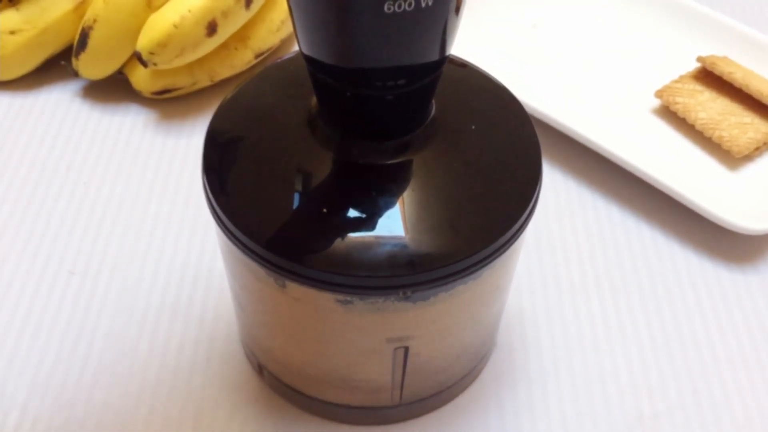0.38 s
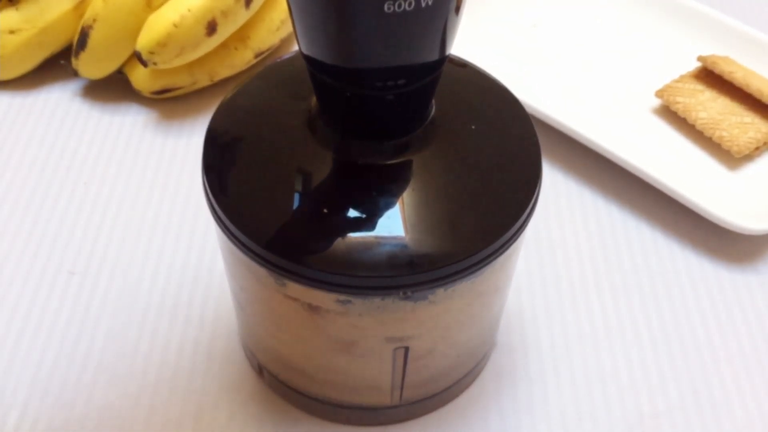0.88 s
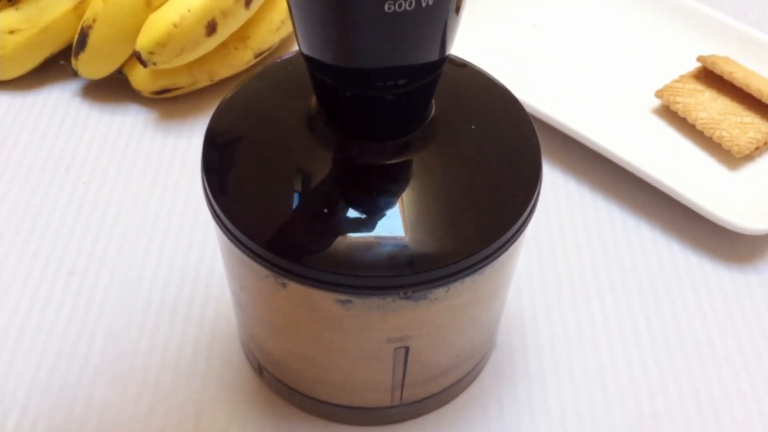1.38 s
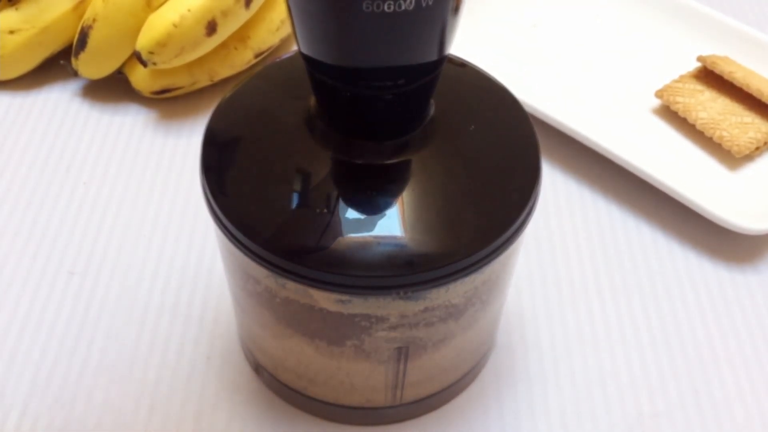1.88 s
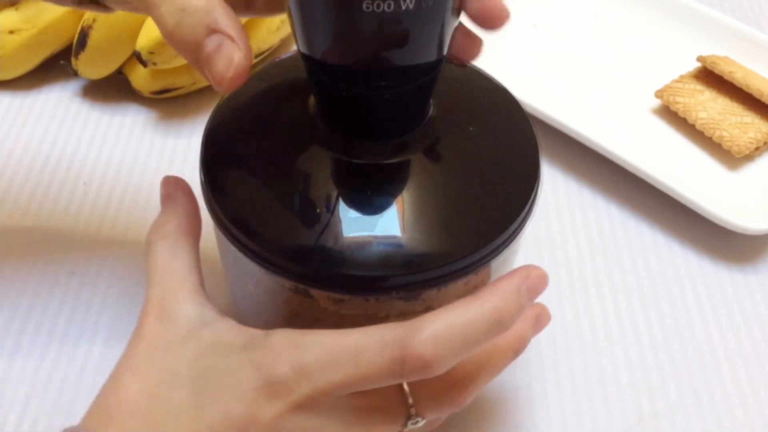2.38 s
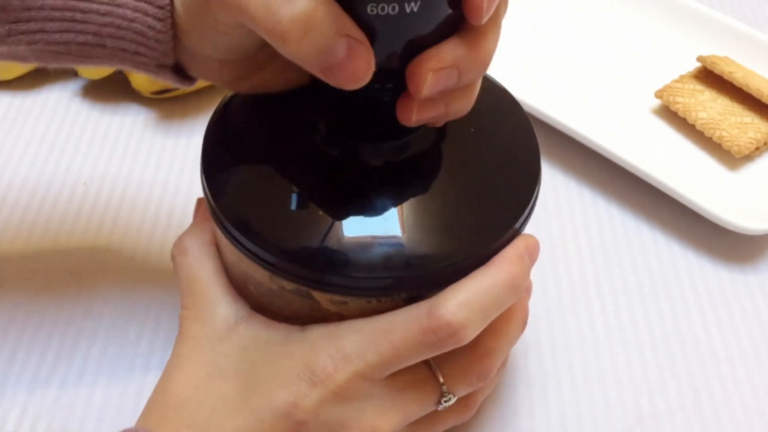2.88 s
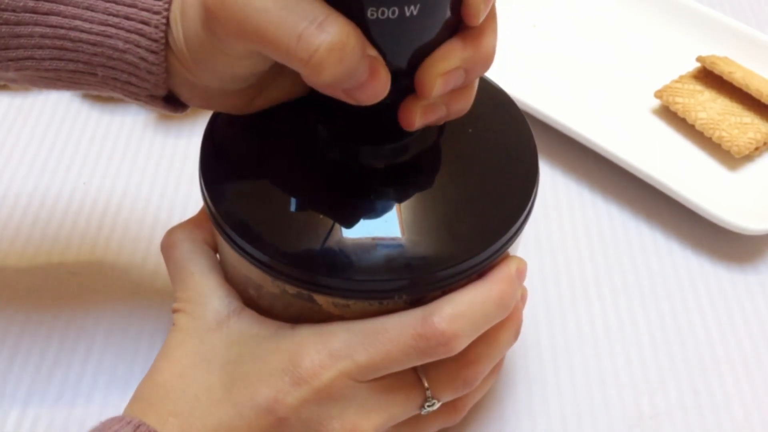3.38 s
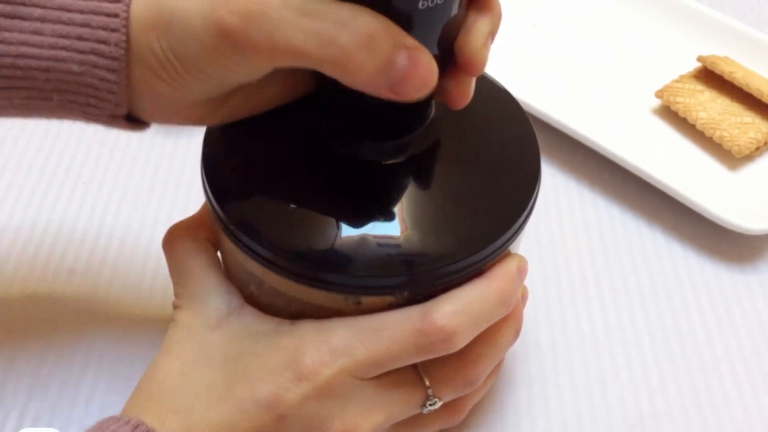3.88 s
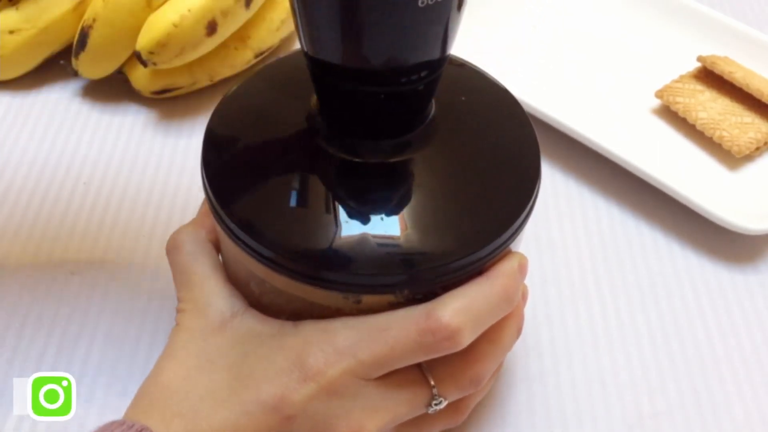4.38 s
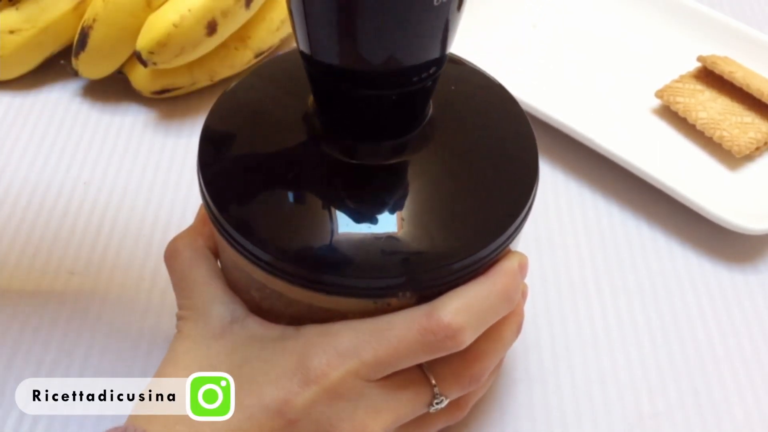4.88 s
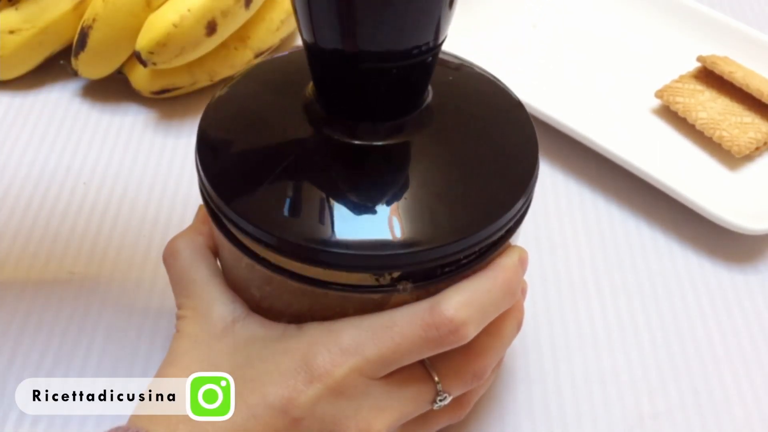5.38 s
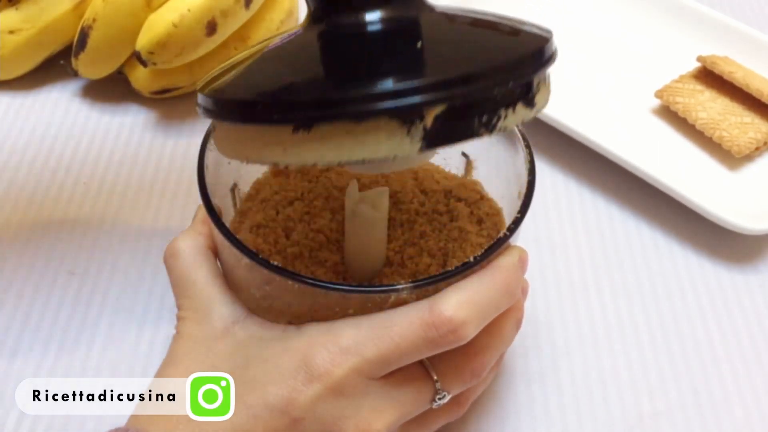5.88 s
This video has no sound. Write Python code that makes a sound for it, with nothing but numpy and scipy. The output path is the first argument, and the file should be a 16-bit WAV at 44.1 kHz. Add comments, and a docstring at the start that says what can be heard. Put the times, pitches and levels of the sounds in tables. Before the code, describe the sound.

Close up in a kitchen, a chopper is already whirling biscuit chunks: a loud dense rattle on the plastic wall with bright crumb hiss. It runs down by two seconds, gives a much fainter short whirl, then stops. Small handling ticks, a sharp unlatching snap, a pause, and gritty plastic rubs and ticks as the lid comes off. Slight room echo; sound in the left channel only.

```python
"""Electric chopper on biscuits

A small electric chopper whirls biscuit pieces round a lidded plastic bowl in a kitchen and runs down twice.
Chunks and crumbs are random grains that ring wall, base and lid; hands then grip and rub the bowl (stick-slip
grains), the motor unit unlatches with a snap, and the lid is twisted loose and lifted off among ticks.
Echo and faint room tone surround it. One microphone feeds the left channel; the right one is silent."""
import sys
import numpy as np
from scipy import signal
from scipy.fft import rfft, irfft
from scipy.io import wavfile

SR = 44100
rng = np.random.default_rng(int(sys.argv[2]) if len(sys.argv) > 2 else 0)


def inscribe(sig):
    """Save sig as 16-bit PCM at rate SR to the path in sys.argv[1].

    A 1-D sig is mono; a 2-D sig holds one channel per row.
    Samples are clipped to [-1, 1] before scaling.
    """
    pcm = np.round(np.clip(np.atleast_2d(sig).T, -1, 1) * 32767)
    wavfile.write(sys.argv[1], SR, pcm.astype(np.int16))


def voltage_ratio(level):
    """Linear amplitude factor for a level in decibels (scalar or array-like)."""
    return 10 ** (np.asarray(level, float) / 20)


N = 275625

# resonances of the base on the table: centre_hz, width_hz, level_db
BASE_MODES = [(113, 35, -4), (190, 110, -9.5), (299, 31, 2), (376, 66, -4), (699.6, 62, -4.5)]


def whirl():
    """Chunks ring the wall and drum the base; crumbs spray lid and wall in step with the blades."""
    # the two whirls: time_s, spray_reference_db, drumming_db (relative to the spray)
    whirl_levels = [
        [(0.0, -24, -11), (0.3, -25, -9.5), (0.7, -27, -7.5), (1.2, -27, -8.5), (1.45, -29, -6.5),
         (1.52, -31.5, -8.5), (1.66, -36, -12), (1.72, -42, -12), (1.86, -47, -5.5), (1.9, -57.5, -11),
         (1.97, -78.5, -3)],
        [(2.192, -45, -25), (2.215, -42, -13), (2.29, -46, -15), (2.38, -48.5, -5), (2.45, -56.5, -17),
         (2.53, -70, -4), (2.57, -85, -3)],
    ]
    # blade speed: time_s, passes_per_s
    blade_speed = [(0, 65), (1.3, 68.5), (1.97, 22.3), (2.19, 41.1), (2.57, 17)]
    # resonances of the bowl wall: centre_hz, width_hz, level_db
    wall_modes = [(894, 240, -5.5), (1186, 350, 0), (1301, 320, 2.5), (1430, 340, 0.5), (1770, 1100, -17),
                  (2341, 33, 5.5), (2483, 100, -1.5)]
    # resonances of the lid: centre_hz, width_hz, level_db
    lid_modes = [(3580, 330, -5), (4706, 190, 8), (5460, 250, 3.5), (6260, 900, -2.5), (6510, 230, 3.5),
                 (9200, 170, -24), (9040, 240, -3.5)]
    # spectrum of the crumb hiss: frequency_hz, level_db
    crumb_spectrum = [(88, -41), (150, -25.5), (308, -10), (561, -15), (1430, -3.5), (1830, -12.5),
                      (2410, -12), (2870, -16), (3550, -6), (4060, -15), (5540, -7.5), (7560, -18),
                      (15500, -26)]
    rattle_db, hits_per_s = 1.0, 500   # chunk rattle above the spray; mean rate before its surges
    rattle_surge_db, drumming_surge_db = 2.5, 3   # random swing as the load tumbles

    crumb_db, drumming_db = in_time(whirl_levels)
    chunk_db = crumb_db + rattle_db + rattle_surge_db * np.clip(drift(22), -2, 1.2)
    drum_db = crumb_db + drumming_db + drumming_surge_db * drift(6)

    passes = np.cumsum(in_time([blade_speed], silent=0)[0]) / SR
    # the half-rate term makes one blade throw more
    sweep = voltage_ratio(1.2 * np.cos(2 * np.pi * passes) + 1.0 * np.cos(np.pi * passes))

    hits = grains(hits_per_s * voltage_ratio(2.5 * np.clip(drift(15), -2, 1.2)), spread_db=2.3)
    # a soft contact has no sharp edge
    soft_contact = signal.butter(2, [700, 3200], "band", fs=SR, output="sos")
    wall_ring = struck(hits, wall_modes, scatter_db=5.5)
    wall = rms_one(signal.sosfilt(soft_contact, wall_ring), 800, 3800)
    base_hits = hits + grains(900, spread_db=1.0)
    drum = rms_one(struck(base_hits, BASE_MODES, scatter_db=6.0), 140, 650)

    spray = sweep * voltage_ratio(1.0 * drift(40)) * grains(7000, spread_db=2.0)
    lid = rms_one(struck(spray, lid_modes, scatter_db=19.5), 4000, 9000)
    hiss = rms_one(colour(spray, crumb_spectrum), 3500, 9000)
    crumbs = voltage_ratio(crumb_db) * (voltage_ratio(-4) * lid + voltage_ratio(-1.5) * hiss)
    return voltage_ratio(chunk_db) * wall + voltage_ratio(drum_db) * drum + crumbs + biggest_chunks()


def biggest_chunks():
    """Each large chunk flung at the wall rings it low and high, ticks the lid and cracks."""
    # impacts: time_s, wall_level_db, wall_pitch_hz, upper_ring_db, lid_tick_db
    chunks = [(0.0014, -12, 1360, -14.5, -18), (0.0189, -6, 1360, -20, -16.5),
              (0.0485, -10, 1300, -27, -18), (0.0846, -13.5, 1580, -22.5, -17),
              (0.098, -11.5, 1320, -24, -23), (0.1176, -14, 1330, -33, -26), (0.1347, -14, 1170, -21, -19),
              (0.1484, -7.5, 1250, -17.5, -13.5), (0.2048, -18, 1230, -22, -20),
              (0.2299, -10.5, 1380, -19, -18), (0.2472, -8.5, 1260, -16.5, -21),
              (0.2621, -15, 1370, -16.5, -23), (0.31, -12, 1410, -25, -22.5),
              (0.3288, -9.5, 1460, -21, -23.5), (0.3547, -16.5, 1240, -25.5, -17.5),
              (0.3771, -15, 1150, -28, -23.5), (0.396, -8, 1400, -11, -21),
              (0.429, -16, 1440, -27.5, -17.5), (0.4553, -11, 1160, -27, -22),
              (0.491, -22, 1500, -23.5, -22), (0.5167, -18, 1430, -27, -26.5),
              (0.5383, -14, 1450, -25.5, -21), (0.5738, -5.5, 1380, -23.5, -20),
              (0.5946, -18, 1390, -23.5, -14.5), (0.633, -13.5, 1290, -29.5, -23.5),
              (0.6639, -15.5, 1470, -26.5, -21.5), (0.7028, -13, 1350, -22.5, -24),
              (0.7581, -9.5, 1150, -21.5, -20.5), (0.777, -10, 1260, -26.5, -21.5),
              (0.8014, -9.5, 1250, -30, -20.5), (0.8092, -6.5, 1410, -24, -22.5),
              (0.839, -13, 1330, -30, -24), (0.8708, -10.5, 1510, -28, -24),
              (0.8894, -9.5, 1260, -28, -19.5), (0.9455, -9.5, 1340, -28, -25),
              (1.0213, -13, 1270, -28, -24.5), (1.047, -13, 1310, -28, -24), (1.096, -11.5, 1390, -28, -19),
              (1.135, -12, 1450, -19, -19), (1.1838, -11.5, 1430, -20, -14.5),
              (1.2025, -10, 1170, -25, -23.5), (1.2531, -15, 1320, -31, -26),
              (1.2793, -12.5, 1250, -29.5, -26), (1.3289, -12, 1370, -31, -25.5),
              (1.395, -23.5, 1250, -31.5, -15.5), (1.431, -10.5, 1250, -30.5, -26.5),
              (1.4568, -5, 1430, -25.5, -23), (1.5223, -11.5, 1290, -25, -31),
              (1.5429, -19, 1160, -31.5, -29), (1.6247, -17.5, 1320, -40, -27),
              (1.6573, -20, 1470, -34, -20.5), (1.7521, -29, 1325, -44, -22.5),
              (1.8104, -49, 1180, -32, -39), (1.8314, -28, 1350, -41, -42), (2.1936, -20, 1410, -48, -52),
              (2.229, -38, 1410, -49, -32), (2.2633, -33, 1190, -52, -39), (2.2857, -43, 1300, -53, -32),
              (2.3243, -28.5, 1340, -62.5, -29.5), (2.3815, -30, 1400, -54, -37),
              (2.4382, -37, 1300, -56, -40.5), (2.5026, -46, 1203, -53, -61)]
    upper_ring_hz, lid_tick_hz, pitch_scatter = 2380, 5470, 0.037   # scatter as a fraction

    out = crack([c[0] for c in chunks], [c[4] - 2.5 for c in chunks], lasts_s=0.0011, above_hz=2500)
    detune = 1 + pitch_scatter * rng.standard_normal((len(chunks), 2))
    for (s, db, hz, upper_db, tick_db), (upper, tick) in zip(chunks, detune):
        add(out, s, db + 0.1, hz, 0.016)
        add(out, s, upper_db + 5, upper_ring_hz * upper, 0.03)
        add(out, s, tick_db + 5, lid_tick_hz * tick ** 2, 0.009)   # squared: scatters twice as far
    return out


def snap():
    """The latch lets go in a few slips; each cracks and rings the bright shell and the dull housing."""
    # slips of the latch: time_s, bright_db, dull_db, crack_db
    latch_slips = [(3.6403, -28, -52, -40), (3.6433, -23.5, -48, -52), (3.6453, -10, -13, -32.5),
                   (3.6472, -29.5, -14.5, -53), (3.6488, -28, -9, -40), (3.6552, -42, -41, -35)]
    # rings of the dull housing: pitch_hz, level_db, t60_s
    housing_rings = [(248, -19.5, 0.16), (428, -14.5, 0.16), (336, -10, 0.032), (446, 4, 0.018),
                     (718, 4, 0.011), (862, -2.5, 0.026), (1213, -11, 0.045), (1337, 10.5, 0.016),
                     (1660, 4, 0.018), (1865, -25, 0.014)]
    # rings of the bright shell: pitch_hz, level_db, t60_s
    shell_rings = [(3230, 5, 0.01), (4070, 8.5, 0.0047), (4590, 6.5, 0.0067), (5620, 1, 0.011),
                   (8000, 3, 0.0049)]

    times, cracks_db = [slip[0] for slip in latch_slips], [slip[3] for slip in latch_slips]
    out = crack(times, cracks_db, lasts_s=0.00069, above_hz=2700)
    for s, bright_db, dull_db, _ in latch_slips:
        for level_db, rings in ((bright_db, shell_rings), (dull_db, housing_rings)):
            for hz, db, t60 in rings:
                add(out, s, level_db + db - 11.5, hz, t60)
    return out


def ticks():
    """Plastic and crumbs tick: a crack of a few milliseconds, a short bright ring and a dull knock."""
    # ticks: time_s, bright_db, bright_pitch_hz, dull_db, dull_pitch_hz, crack_db
    tick_hits = [(2.5504, -57, 3560, -70, 1520, -74), (2.9267, -38, 3630, -41, 924, -58),
                 (2.9926, -34.5, 5540, -46.5, 751, -45), (3.0394, -61, 4030, -54, 744, -82),
                 (3.1572, -60, 5220, -64, 1200, -78), (3.2994, -59, 5960, -71, 938, -77),
                 (3.3478, -52, 3400, -66, 1800, -59.5), (3.4244, -67, 3480, -67, 1030, -78),
                 (3.5543, -47, 5350, -66, 778, -63), (3.7918, -39, 5360, -43.5, 1160, -53),
                 (4.5994, -44, 5430, -51, 745, -57), (4.7641, -45, 5660, -61, 930, -64),
                 (4.8788, -54, 5600, -70, 1040, -61), (4.9057, -33, 6150, -51, 1050, -49.5),
                 (4.9314, -47, 5140, -57, 953, -61), (5.0374, -53, 5460, -54, 1176, -60.5),
                 (5.0759, -45, 8800, -64, 702, -58), (5.1154, -61, 5640, -67, 947, -75),
                 (5.1627, -53, 5230, -63, 1160, -65), (5.1926, -48, 5540, -61, 1620, -62),
                 (5.2094, -47, 5610, -58, 1600, -55), (5.222, -34.5, 5610, -58, 953, -49),
                 (5.2314, -35, 5220, -55, 1030, -44), (5.2444, -37, 3360, -43, 1230, -47),
                 (5.2644, -33, 6100, -47, 1330, -49), (5.3044, -41, 4700, -67, 891, -58),
                 (5.3283, -43, 4600, -68, 1190, -55), (5.3822, -46, 5350, -63, 1320, -65),
                 (5.4355, -38, 3330, -57, 1080, -55), (5.4535, -37, 4530, -47.5, 864, -54),
                 (5.472, -44, 3800, -47, 907, -50), (5.4834, -39, 5460, -57, 1100, -60),
                 (5.5328, -48, 4780, -65, 888, -59), (5.5598, -48, 4770, -67, 750, -61),
                 (5.5797, -50, 4750, -71, 401, -67), (5.5952, -48, 5600, -66, 1190, -72),
                 (5.6074, -44, 5830, -64, 786, -67), (5.6466, -45, 5560, -57, 1180, -57),
                 (5.68, -26.5, 5570, -52, 1590, -52), (5.6864, -33, 4570, -49, 401, -52),
                 (5.7264, -38, 5040, -46, 401, -49), (5.7374, -45, 5170, -41, 472, -55),
                 (5.7778, -50, 5450, -50.5, 1010, -64), (5.8147, -58, 4400, -57, 494, -70),
                 (5.8381, -44, 4470, -56, 970, -67), (5.8915, -39, 5200, -54, 1034, -59),
                 (5.911, -34, 4140, -47, 448, -51), (5.9389, -34, 5230, -52, 525, -54),
                 (5.9768, -37.5, 5310, -58, 684, -59), (6.0412, -38.5, 4580, -47, 682, -64)]

    out = crack([t[0] for t in tick_hits], [t[5] + 9 for t in tick_hits], lasts_s=0.0017, above_hz=1500)
    for s, db, hz, dull_db, dull_hz, _ in tick_hits:
        add(out, s, db - 2.0, hz, 0.009)
        add(out, s, dull_db + 6.5, dull_hz, 0.006 + 7.6 / dull_hz)   # low knocks ring longer
    return out


def rubs():
    """Stick and slip: clumped grains in the treble, softer ones in the body, pushes through the table."""
    # rubs of hands and lid rim: start_s, length_s, rim_scratch_db, fine_grit_db, body_db, scratch_pitch_hz
    strokes = [(2.923, 0.0084, -70, -79.5, -51.5, 5380), (2.989, 0.0052, -69.5, -69.5, -62, 4880),
               (3.154, 0.012, -72, -79, -74, 5050), (3.553, 0.01, -72, -81, -74.5, 5000),
               (3.628, 0.026, -58.5, -62.5, -59.5, 4800), (3.647, 0.047, -58.5, -67, -47, 5070),
               (3.728, 0.08, -65, -65.5, -52, 5140), (4.583, 0.046, -57, -58, -52, 5400),
               (4.643, .03, -67, -77, -61, 5360), (4.69, .018, -65.5, -72.5, -63, 5280),
               (4.753, .022, -67, -77.5, -64.5, 5400), (4.876, 0.053, -58, -64, -55, 5630),
               (4.954, 0.039, -65, -68, -56.5, 5150), (5, 0.037, -78, -76.5, -65.5, 5100),
               (5.218, 0.039, -54, -57.5, -50.5, 5380), (5.255, 0.076, -59.5, -67, -61, 4900),
               (5.386, 0.033, -58, -75, -70, 5200), (5.421, 0.026, -62, -61, -62, 5100),
               (5.448, 0.037, -57, -60, -54, 5230), (5.496, 0.046, -66.5, -79, -71.5, 5580),
               (5.59, 0.056, -57, -78, -73.5, 5500), (5.652, 0.032, -50.5, -68, -74, 5600),
               (5.679, 0.026, -40.5, -57.5, -56.5, 5440), (5.714, 0.031, -52.5, -58.5, -55, 5350),
               (5.756, 0.038, -57.5, -64.5, -66, 5300), (5.812, 0.05, -51.5, -71, -65, 4480),
               (5.896, .022, -53, -61, -56, 5080), (5.933, 0.013, -56, -66, -61.5, 5250),
               (5.968, 0.026, -60, -71.5, -62, 5000)]
    # spectrum of the fine grit: frequency_hz, level_db
    grit_spectrum = [(1500, -32), (2500, -7), (3300, -0.5), (4500, -3), (6500, -2.5), (7200, -9.5),
                     (8900, -7.5), (10200, -17.5), (13500, -15), (15800, -21)]
    # spectrum of the rubbed body: frequency_hz, level_db
    body_spectrum = [(210, -29), (350, -11.5), (493, -2.5), (559, -8.5), (916, 0.5), (1830, -3), (2290, -8),
                     (3000, -9), (3900, -32), (6600, -120)]
    rise_db_per_s, fall_db_per_s = 1500, 1500   # every rub swells and dies alike
    sag_db, thump_db = 2, -5   # weakening along a stroke; push relative to the body

    t, rows = np.arange(N) / SR, np.array(strokes)
    levels, rim_hz = np.zeros((3, N)), np.full(N, rows[0, 5])
    for start, length, *dbs, hz in rows:
        rise_db = rise_db_per_s * (t - start)
        fall_db = fall_db_per_s * (start + length - t)
        shape_db = np.minimum(0, np.minimum(rise_db, fall_db))
        shape_db = shape_db - sag_db * np.clip((t - start) / length, 0, 1)
        levels = levels + voltage_ratio(np.array(dbs)[:, None] + np.maximum(shape_db, -100))
        rim_hz[t > start - 0.02] = hz   # the pitch is in place before the rub is heard
    rim_gain, grit_gain, body_gain = levels

    slips = grains(3500 * voltage_ratio(8.0 * drift(90)), spread_db=2.2) * voltage_ratio(2.5 * drift(80))
    grit = rms_one(colour(slips, grit_spectrum), 7000, 14000)
    rim_hz = np.clip(rim_hz, 3500, 7000)
    # two resonances in a row give steep flanks
    scratch = gliding(slips + 1e-18, rim_hz, width_hz=900)
    rim = rms_one(gliding(scratch, rim_hz, width_hz=1500))
    body = rms_one(colour(slips + grains(2200, spread_db=2.0), body_spectrum), 690, 1700)
    pushes = grains(300, spread_db=4.0)
    thump = rms_one(struck(pushes, BASE_MODES[:3], scatter_db=3.0), 80, 400)

    treble = voltage_ratio(-1.5) * grit_gain * grit + voltage_ratio(-9.0) * rim_gain * rim
    return treble + voltage_ratio(-3.5) * body_gain * (body + voltage_ratio(thump_db) * thump)


def kitchen(x):
    """Echo cloud: noise that dies band by band, after a short gap."""
    # decay of the kitchen: frequency_hz, t60_s
    decay = [(100, 0.17), (1400, 0.95), (3000, 0.65), (8000, 0.36), (15000, .15)]

    t, tail = np.arange(int(0.8 * SR)) / SR, 0
    hz, t60 = np.transpose(decay)
    edges = np.geomspace(80, 16000, 13)
    for low, high in zip(edges, edges[1:]):
        band_pass = signal.butter(2, [low, high], "band", fs=SR, output="sos")
        band = signal.sosfilt(band_pass, rng.standard_normal(len(t)))
        band_t60 = np.interp(np.log(low * high) / 2, np.log(hz), t60)
        tail = tail + band * voltage_ratio(-60 * t / band_t60)
    tail = tail * np.clip(t / 0.0024 - 0.3, 0, 1)   # gap, then a quick fade-in
    return signal.fftconvolve(x, tail / np.sqrt(np.sum(tail ** 2)))[:N]


def room_tone():
    """Faint flickering hiss above a far rumble in the low room modes, each fluttering on its own."""
    # spectrum of the hiss: frequency_hz, level_db
    air_spectrum = [(130, -28.5), (220, -6), (403, -13), (473, -19.5), (700, -15.5), (807, -17.5),
                    (947, -14), (1330, -19.5), (1740, -19.5), (2270, -29.5), (5140, -37), (6040, -36),
                    (15500, -47)]
    # room modes stirred by the rumble: centre_hz, width_hz (of the first of two passes), level_db
    room_modes = [(53.6, 28, 0), (113.8, 28, -0.5), (181, 6.9, -6), (247, 4.9, -15)]
    # wavering of the rumble: time_s, level_db
    rumble_swell = [(1.8, -79), (1.88, -61.5), (2.17, -69), (2.28, -56), (2.44, -73), (2.46, -50.5),
                    (2.51, -82), (2.56, -51.5), (2.66, -73), (2.67, -58.5), (3.6, -53.5), (3.66, -44),
                    (3.89, -66.5), (4.01, -56), (4.68, -59), (4.95, -49), (5.18, -61), (5.27, -45),
                    (5.3, -58), (5.71, -52), (5.89, -62.5), (6.09, -55.5), (6.15, -66), (6.2, -59)]
    air_db, flutter_db = -67, 2.5

    hiss = rms_one(colour(rng.standard_normal(N), air_spectrum), 230, 3000)
    air = voltage_ratio(air_db + 1.5 * drift(6)) * hiss
    rumble = np.zeros(N)
    for hz, width, db in room_modes:
        narrow = resonance(rng.standard_normal(N), hz, width)
        mode = rms_one(resonance(narrow, hz, 2 * width))
        rumble += voltage_ratio(db + flutter_db * drift(6.5)) * mode
    s, swell_db = np.transpose(rumble_swell)
    return air + voltage_ratio(np.interp(np.arange(N) / SR, s, swell_db)) * rms_one(rumble)


def crack(times, levels_db, lasts_s, above_hz):
    """Short bursts of bright noise, each dying exponentially with time constant lasts_s."""
    starts = np.zeros(N)
    starts[np.round(np.array(times) * SR).astype(int)] = voltage_ratio(np.array(levels_db))
    envelope = signal.lfilter([1], [1, -np.exp(-1 / (lasts_s * SR))], starts)
    dying = envelope * rng.standard_normal(N)
    return signal.sosfilt(signal.butter(2, [above_hz, 11000], "band", fs=SR, output="sos"), dying)


def add(out, s, db, hz, t60):
    """A dying sine that starts at s, with a contact time of a fraction of a millisecond."""
    i, t = round(s * SR), np.arange(int(t60 * SR)) / SR
    envelope = voltage_ratio(db - 60 * t / t60) * (1 - np.exp(-t / 0.0002))
    out[i:i + len(t)] += envelope * np.sin(2 * np.pi * hz * t)


def grains(per_s, spread_db):
    """Random clicks, mostly small and a few large; power independent of their rate."""
    sizes = voltage_ratio(spread_db * np.minimum(rng.exponential(1, N), 5)) * rng.choice([-1, 1], N)
    per_s = np.maximum(per_s, 10)
    return sizes * (rng.random(N) < per_s / SR) / np.sqrt(per_s)


def struck(hits, modes, scatter_db):
    """Every hit drives every resonance with a strength of its own; neighbours have opposite signs."""
    out = np.zeros(N)
    for k, (hz, width, db) in enumerate(modes):
        strength = voltage_ratio(scatter_db * np.clip(rng.standard_normal(N), -2, 2))
        out += voltage_ratio(db) * (-1) ** k * resonance(hits * strength, hz, width)
    return out


def resonance(x, hz, width_hz):
    """Two-pole band-pass, gain 1 on top."""
    r = np.exp(-np.pi * width_hz / SR)
    poles = [1, -2 * r * np.cos(2 * np.pi * hz / SR), r * r]
    return signal.lfilter([(1 - r * r) / 2, 0, (r * r - 1) / 2], poles, x + 1e-18)


def gliding(x, hz, width_hz):
    """A resonance whose centre moves, block by block."""
    out, state, r = np.zeros(N), np.zeros(2), np.exp(-np.pi * width_hz / SR)
    for i in range(0, N, 256):
        poles = [1, -2 * r * np.cos(2 * np.pi * hz[i] / SR), r * r]
        out[i:i + 256], state = signal.lfilter([1, 0, -1], poles, x[i:i + 256], zi=state)
    return out


def colour(x, spectrum):
    """Causal (minimum-phase) filter with the given spectrum, by folding its cepstrum."""
    hz, db = np.transpose(spectrum)
    grid = np.maximum(np.fft.rfftfreq(8192, 1 / SR), 1)
    cepstrum = irfft(np.log(voltage_ratio(np.interp(np.log(grid), np.log(hz), db))))
    cepstrum[1:4096] *= 2
    cepstrum[4097:] = 0
    return signal.fftconvolve(x, irfft(np.exp(rfft(cepstrum))))[:N]


def drift(rate):
    """Slow random wander of spread 1, low-passed near the given rate in Hz."""
    steps = rng.standard_normal(int(N / SR * 400) + 2)   # 400 steps per second
    r = np.exp(-2 * np.pi * rate / 400)
    # a first run through the same steps settles the filter
    slow = signal.lfilter([1], [1, -2 * r, r * r], np.tile(steps, 2))[len(steps):]
    return np.interp(np.arange(N) / SR * 400, np.arange(len(slow)), slow / slow.std())


def in_time(tables, silent=-140):
    """One curve per column after the time; outside the tables every curve stays at the silent value."""
    t = np.arange(N) / SR
    out = np.full((len(tables[0][0]) - 1, N), float(silent))
    for s, *columns in map(np.transpose, tables):
        inside = (t >= s[0]) & (t <= s[-1])
        out[:, inside] = [np.interp(t[inside], s, c) for c in columns]
    return out


def rms_one(x, low_hz=20, high_hz=16000):
    """Scales the whole signal so that the named band has rms 1."""
    band = signal.sosfilt(signal.butter(3, [low_hz, high_hz], "band", fs=SR, output="sos"), x)
    return x / np.sqrt(np.mean(band ** 2) + 1e-20)


def scene():
    """Everything happens close to the microphone, with a little kitchen echo and room tone."""
    near = whirl() + rubs() + ticks() + snap()
    heard = near + voltage_ratio(-20.5) * kitchen(near) + room_tone()
    return np.stack([2 * heard, np.zeros(N)])


def record(dry):
    """The microphone drops the deepest bass; peaks are rounded near full scale and the top is cut steeply."""
    heard = signal.sosfilt(signal.butter(4, 42, "high", fs=SR, output="sos"), dry)
    rounded = np.tanh(heard / 1.1) * 1.1
    # 70 dB down from 15800 Hz upward
    return signal.sosfilt(signal.cheby2(20, 70, 15800, fs=SR, output="sos"), rounded)


dry = scene()
out = record(dry)
inscribe(out)
```